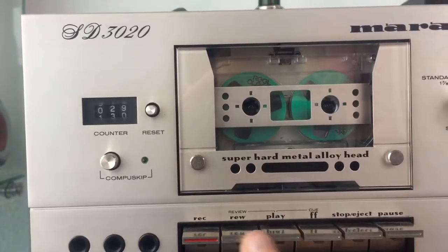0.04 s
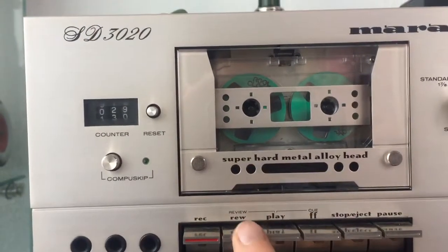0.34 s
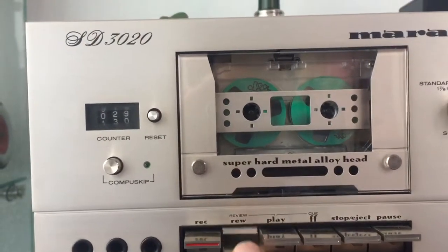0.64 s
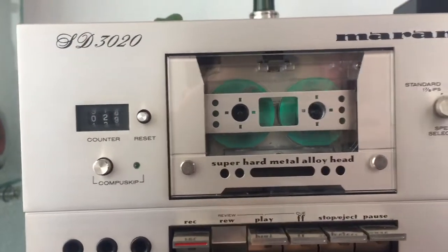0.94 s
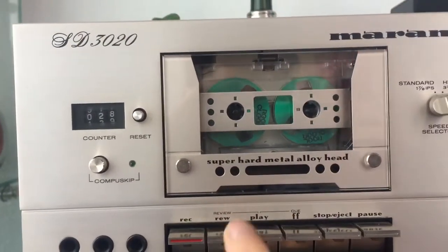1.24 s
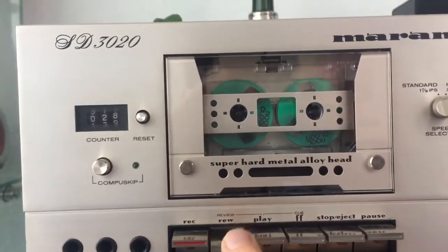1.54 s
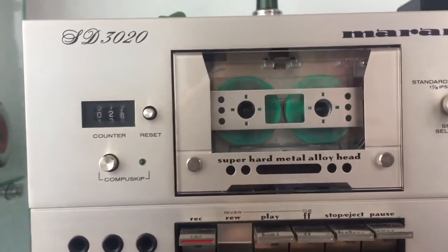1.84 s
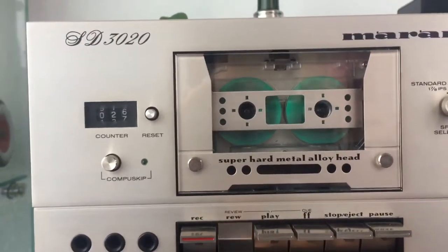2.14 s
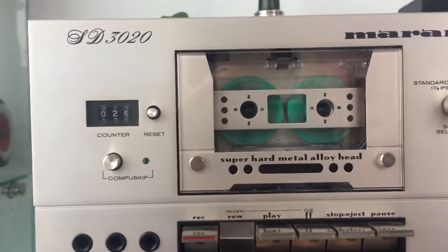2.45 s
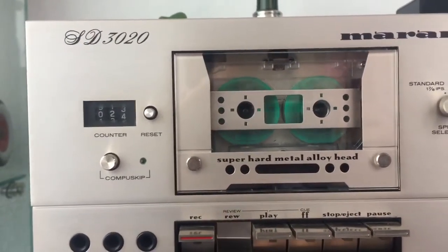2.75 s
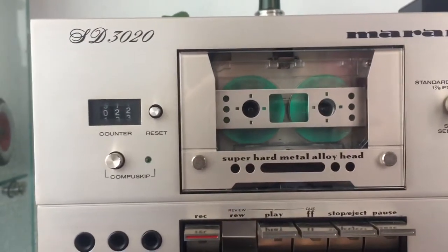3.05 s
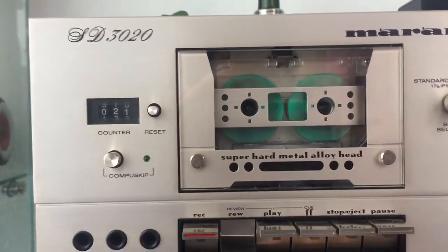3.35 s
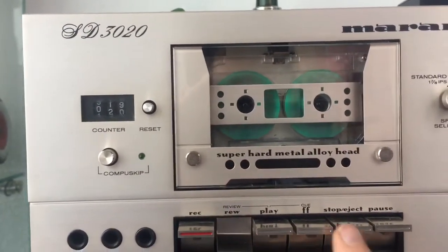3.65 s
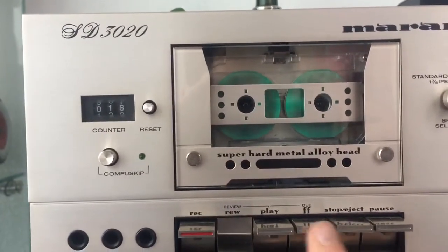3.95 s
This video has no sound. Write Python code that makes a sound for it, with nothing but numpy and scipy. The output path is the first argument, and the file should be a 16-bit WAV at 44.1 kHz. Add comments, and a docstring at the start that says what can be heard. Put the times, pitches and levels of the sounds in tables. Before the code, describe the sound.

Close up indoors, a cassette player's rewind mechanism chatters in a short burst that ends with a key clacking. After a pause it clicks on again and rattles quickly and steadily, with light tape hiss underneath.

```python
"""A quiet room, close to a cassette deck in rewind: one short try, a clack as the key springs back,
then a steady run. A worn idler wheel knocks at the same spots in each turn, about eleven turns a
second, and rings the chassis over gear chatter, the swish of the reel and tape hiss.
Keys and levers click; mains hum and a faint, slowly climbing drone lie underneath."""
import sys
import numpy as np
from scipy import signal
from scipy.fft import rfft, irfft
from scipy.io import wavfile

SR = 44100
rng = np.random.default_rng(int(sys.argv[2]) if len(sys.argv) > 2 else 0)


def to_wav(sig):
    """Store sig (one row per channel, or 1-D mono) as 16-bit WAV at the path in sys.argv[1].

    Samples outside -1..1 are clipped; the rate is SR.
    """
    pcm = np.clip(np.atleast_2d(sig), -1, 1) * 32767
    pcm = np.round(pcm).astype(np.int16)
    wavfile.write(sys.argv[1], SR, pcm.T)  # frames by channels


N = 176400
T = np.arange(N) / SR

# idler speed in the short try and the long run: time_s, turns_per_s
TRY_SPEED = [(.8, 10.64), (1.2, 10.64)]
RUN_SPEED = [(1.8, 10.756), (2.25, 10.932), (2.7, 11.106), (3.3, 11.206), (4, 11.312)]
TRY_START_TURNS, RUN_START_TURNS = .835, .012
# how hard the drive bears on the idler: time_s, level_db
TRY_LOAD = [(0.798, -29), (0.83, -6.5), (.84, -6), (0.872, 5.5), (0.902, -1.5), (1.06, -1), (1.121, -4),
            (1.145, -27), (1.19, -42)]
RUN_LOAD = [(1.793, -22), (1.829, -4), (2.02, -0.5), (2.071, -5), (2.451, -4), (2.999, -1), (3.5, 0),
            (4, 1)]
# worn spots around the rim: angle_turns, level_db
WORN_SPOTS = [(.068, -9), (.168, -3), (.226, -11), (.3, -11.5), (.4, -3.5), (.497, 0), (.548, -2.5),
              (.735, -17), (.808, -12.5), (.872, -13.5), (.915, -12)]

def idler(speed, start_turns, load, knock_db=-5, jitter_s=.0003):
    """One rewind: each worn spot knocks once a turn, with loose gear chatter in between."""
    turns, running = rotation(speed, start_turns)
    chatter = amp(-22.5) * crackle(turns, per_s=1100, scatter_db=2.5, swell_db=5)
    knocks = np.zeros(N)
    for angle, db in WORN_SPOTS:
        passes_s = T[1:][np.diff(np.floor(turns - angle)) > 0]
        for start_s, (slip, force) in zip(passes_s, rng.standard_normal((40, 2))):
            scatter_db = 2 * np.clip(force, -2, 1)
            add(knocks, start_s + jitter_s * slip, amp([knock_db + db + scatter_db]))
    return (rubber(knocks) + chatter) * running * amp(curve(load))


def rubber(knocks, cutoff_hz=1850):
    """The rubber wheel takes the top off its knocks."""
    return signal.lfilter(*signal.butter(2, cutoff_hz, fs=SR), knocks)


# accents, the hardest knocks of the drive: start_s, level_db
JOLTS = [(0.8357, -1), (0.9255, -1.5), (0.9316, -1), (1.0543, -2), (1.935, -5), (1.9979, -4), (2.123, -5),
         (2.2148, -5), (2.2753, -6), (2.3063, -4), (2.3665, -5), (2.3976, -4), (2.4578, -5), (2.4874, 0),
         (2.5354, -4), (2.5691, -2), (2.6147, -7), (2.6598, -1), (2.7055, -8), (2.8404, -3), (2.9394, -3),
         (2.9984, -4), (3.1087, -4), (3.1987, -2), (3.2584, -3), (3.2875, -1), (3.3483, -7), (3.3849, -4),
         (3.4378, -5), (3.5345, -1), (3.5634, -3), (3.6233, -2), (3.7119, -2), (3.8219, -1), (3.9099, -4)]
# tone of the shaken chassis: frequency_hz, level_db
CHASSIS_TONE = [(30, -52), (60, -57), (200, -32.5), (350, -34), (550, -40), (700, -12), (810, -19.5),
                (880, -12.5), (1000, -22.5), (1130, -.5), (1290, 2.5), (1440, -2), (1560, 1), (1750, -14),
                (2020, -7), (2450, -18.5), (2700, -27), (3200, -27), (4200, -28), (4850, -38.5),
                (5800, -36), (8000, -46), (16000, -50)]

def drive(duck_before_s=.006, duck_after_s=.002):
    """The idler's blows ring the chassis and rattle in the case."""
    blows = idler(TRY_SPEED, TRY_START_TURNS, TRY_LOAD) + idler(RUN_SPEED, RUN_START_TURNS, RUN_LOAD)
    for start_s, db in JOLTS:
        # nearby knocks and chatter are turned down so each hard knock sounds alone
        blows[round((start_s - duck_before_s) * SR):round((start_s + duck_after_s) * SR)] *= .3
        add(blows, start_s, amp(db) * rubber(signal.unit_impulse(SR // 100)))
    # all-pass: the chassis plate delays the mids of each knock
    poles = signal.iirpeak(1100, Q=1.43, fs=SR)[1]
    chassis = signal.lfilter(poles[::-1], poles, response(CHASSIS_TONE))
    rattle = amp(-2.5) * signal.fftconvolve(blows, chassis)[:N]
    case_ring = reverb(rattle, [(1000, .04)])  # 40 ms tail in every band
    return rattle + amp(-7) * case_ring


# key and lever hits: start_s, level_db, tilt_db_per_octave, thump_db, pitch_hz
CLICKS = [(0.1321, -43, 8.5, -51, 11300), (0.1881, -49, 2.5, -85, 1580), (0.6725, -53.5, -8, -62, 8100),
          (0.7011, -50.5, -7, -54.5, 1820), (0.753, -54.5, -2, -61.5, 3520),
          (0.844, -39.5, -1.5, -42, 3700), (1.0682, -40, -1.5, -73, 8900), (1.082, -34.5, -4.5, -44, 8520),
          (1.094, -39.5, 0, -50, 8500), (1.1203, -33.5, -2.5, -45.5, 5840), (1.189, -40, -4, -60, 2020),
          (1.1996, -22, -4.5, -57, 3460), (1.2003, -22, 5, -34.5, 8230), (1.205, -29, -13, -42, 2020),
          (1.2117, -35, -3, -55.5, 3230), (1.218, -35, -9, -48.5, 2090), (1.2871, -41.5, 3.5, -69, 7940),
          (1.292, -35.5, -4, -53, 3440), (1.3159, -42.5, 7, -81, 8500), (1.3206, -34, -5.5, -54, 3440),
          (1.441, -53.5, 2.5, -59, 3140), (1.67, -49, -2, -52, 8770), (1.6729, -43.5, -9.5, -49.5, 8500),
          (1.704, -51.5, -16, -68, 1114), (1.765, -54, -5.5, -86, 2450), (1.7775, -49.5, -10, -69, 6000),
          (1.819, -46.5, 8, -45, 5430), (1.839, -37, -9, -48, 1960), (1.8652, -36, -2.5, -45, 3330),
          (2.1958, -42.5, -2.5, -55, 3360), (2.202, -37, -5.5, -44.5, 2030), (2.479, -39, -2, -78, 8170),
          (2.51, -39, -14, -89, 3750), (3.8515, -54.5, 3, -75, 8900)]
# tone of a click's snap: frequency_hz, level_db
SNAP_TONE = [(300, -50), (700, -35), (1100, 2.5), (2000, 3), (3200, 0.5), (4600, -1), (6200, -4),
             (7200, -0.5), (8300, -0.5), (9800, -7), (12000, -5), (16000, -15.5)]
# ring of the levers and their spring: pitch_hz, level_db, t60_s
LEVER_MODES = [(1578, 2, 0.11), (2050, -0.5, 0.087), (3003, 0.5, 0.072), (3710, -2, 0.12), (6050, -4, 0.05)]

def keys(size=SR // 2):
    """Each click layers a snap, the ring of the struck part and of the levers, and a case thump."""
    out, t = np.zeros(N), T[:size]
    bands_hz = np.arange(300, 16000, 280)
    for start_s, db, tilt_db, thump_db, pitch_hz in CLICKS:
        bands_db = read(SNAP_TONE, bands_hz) + 3.2 * rng.standard_normal(len(bands_hz))
        snap = noise(np.column_stack([bands_hz, bands_db]), size, tilt_db) * strike(size, t60_s=.026)
        part = resonance(rng.standard_normal(size), pitch_hz, width_hz=350) * fade(size, t60_s=.03)
        levers = np.zeros(size)
        for hz, mode_db, t60_s in LEVER_MODES:
            detuned_hz = hz * rng.uniform(.9, 1.03)
            mode = np.sin(2 * np.pi * (detuned_hz * t + rng.random()))
            levers += amp(mode_db + tilt_db / 2 * np.log2(hz / 5000)) * mode * fade(size, t60_s)
        click = snap + amp(-5) * part + amp(-19.5) * levers
        add(out, start_s, amp(db) * click + amp(thump_db) * case_thump(size))
    return out


# low body under a click: frequency_hz, level_db
THUMP_TONE = [(30, -47), (60, -30), (130, -3), (175, -5), (205, 7), (275, -9), (360, 3), (440, -8),
              (560, -14.5), (700, 3), (820, -3), (1100, -5.5), (2500, -37)]

def case_thump(size):
    """A blow booms in the case, the low notes arriving a little later."""
    boom = noise(THUMP_TONE, size) * strike(size, t60_s=.12)
    lag_cycles = 3.5 * np.log(np.fft.rfftfreq(size, 1 / SR) + 60)
    return irfft(rfft(boom) * np.exp(-2j * np.pi * lag_cycles), size)


# thin resonances of the tape path: pitch_hz, width_hz, level_db
PATH_RESONANCES = [(5784, 660, -5), (6260, 300, -12), (8500, 330, -14.5), (9420, 390, -16)]
# tone of the reel swish and of the tape hiss: frequency_hz, level_db
SWISH_TONE = [(1500, -23), (2700, -6.5), (3200, 8), (3650, -26.5), (4200, -1.5), (4650, -24.5),
              (8000, -24.5)]
HISS_TONE = [(1500, 15), (4000, 6.5), (4900, -1), (6400, -6.5), (7200, 5), (7700, -15), (9000, -10.5),
             (10300, -9.5), (13500, -7.5), (16000, -18.5)]
# shared fader for hiss, rattle and sizzle: time_s, level_db
HISS_FADER = [(.805, -110), (.82, -56), (.86, -58.5), (1.11, -59), (1.17, -69), (1.2, -110), (1.79, -110),
              (1.825, -60), (1.95, -62), (2.3, -63), (4, -66)]
# sizzle against the hiss, easing off as the tape gets up to speed: time_s, level_db
SIZZLE_FADER = [(1.85, -11), (2.5, -21)]

def tape(motor_per_turn=3.55):
    """The tape hisses; in the long run its path rattles with the motor and the reel swishes each turn."""
    turns, running = rotation(RUN_SPEED, RUN_START_TURNS)
    motor_db = 4 * np.cos(2 * np.pi * (motor_per_turn * turns + .654))
    grit = crackle(turns, per_s=1000, scatter_db=3, swell_db=1.5) * amp(motor_db)
    rattle = sum(amp(db) * resonance(grit, hz, width_hz) for hz, width_hz, db in PATH_RESONANCES)
    reel_grit = crackle(turns, per_s=1000, scatter_db=3, swell_db=4.5)
    swish = unit(signal.fftconvolve(reel_grit, response(SWISH_TONE))[:N])
    swish *= running * amp(-64.5 + curve(RUN_LOAD))
    sizzle = resonance(rng.standard_normal(N), hz=14460, width_hz=600) * amp(curve(SIZZLE_FADER))
    return (rattle + noise(HISS_TONE) + sizzle) * amp(curve(HISS_FADER)) + swish


# low end of the chassis: frequency_hz, level_db
RUMBLE_TONE = [(30, -48), (60, -23), (100, -3.5), (150, -11), (175, 1.5), (203, 5.5), (240, 3), (280, 3),
               (320, -10), (362, 7.5), (430, -49), (480, 0.5), (560, -10), (800, -9), (2000, -64)]
# its swells: time_s, level_db
RUMBLE_FADER = [(.62, -103), (.7, -66.5), (.8, -67), (.85, -48), (1.02, -63.5), (1.16, -54), (1.26, -59),
                (1.42, -71), (1.6, -88), (1.7, -70), (1.78, -64.5), (1.87, -51.5), (2.1, -63), (2.22, -62),
                (2.3, -67), (4, -65)]

def rumble():
    """The chassis rumbles, most strongly as each rewind starts."""
    return noise(RUMBLE_TONE) * amp(curve(RUMBLE_FADER))


# faint drone: time_s, pitch_hz, level_db
DRONE = [(.35, 49.6, -85), (.48, 53.3, -67), (.57, 53.7, -58.5), (.73, 55, -60), (1.3, 57, -64),
         (1.5, 62.6, -69.5), (1.86, 71.8, -69), (2.42, 70.4, -68), (2.75, 76, -64), (3.13, 76.7, -63),
         (4, 75.6, -68.5)]
# room tone: frequency_hz, level_db
AIR_TONE = [(15, -39), (25, -13), (108, -2.5), (270, -12.5), (394, -11), (531, -19.5), (575, -21.5),
            (677, -14.5), (3340, -22.5), (16000, -33.5)]

def background(mains_hz=60.7):
    """The bed: a low drone that climbs, mains hum and room air."""
    drone = amp(curve(DRONE, column=2)) * np.sin(2 * np.pi * np.cumsum(curve(DRONE)) / SR)
    hum = amp(-72.5) * np.sin(2 * np.pi * mains_hz * T)
    return np.sqrt(2) * (drone + hum) + amp(-70) * noise(AIR_TONE)


def rotation(speed, start_turns):
    """The idler's angle in turns, and whether it is running."""
    running = (T >= speed[0][0]) & (T <= speed[-1][0])
    return start_turns + np.cumsum(curve(speed) * running) / SR, running


def crackle(turns, per_s, scatter_db, swell_db, peak_turns=.22):
    """Small random contacts that swell once a turn."""
    level_db = scatter_db * np.clip(rng.standard_normal(N), -2, 2)
    level_db += swell_db * np.cos(2 * np.pi * (turns - peak_turns))
    return amp(level_db) * rng.choice([-1, 1], N) * (rng.random(N) < per_s / SR)


def resonance(x, hz, width_hz):
    """A sound through a steep resonance, rms 1."""
    band = signal.iirpeak(hz, hz / width_hz, SR)
    return unit(signal.lfilter(*band, signal.lfilter(*band, x)))


def noise(tone, size=N, tilt_db=0):
    """Coloured noise of rms 1, tilted by tilt_db per octave around the low treble."""
    hz = np.fft.rfftfreq(size, 1 / SR)
    colour = amp(read(tone, hz) + tilt_db * np.log2((hz + 300) / 5000))
    return unit(irfft(rfft(rng.standard_normal(size)) * colour, size))


def response(tone, size=4096):
    """Minimum-phase impulse response of a body, energy 1."""
    log_gain = np.log(amp(read(tone, abs(np.fft.fftfreq(size, 1 / SR)))))
    spectrum = np.exp(np.conj(signal.hilbert(log_gain)))
    impulse = np.fft.ifft(spectrum).real[:size // 2]
    return impulse / np.linalg.norm(impulse)


def reverb(x, t60s, size=SR // 2):
    """A diffuse tail, each band dying at its own speed."""
    hz, t, bands = signal.stft(rng.choice([-1., 1.], size), SR, nperseg=128)
    decay = np.exp(-np.log(1000) * t / read(t60s, hz)[:, None])
    tail = signal.istft(bands * decay, SR, nperseg=128)[1]
    tail[:SR // 400] = 0  # 2.5 ms pre-delay
    return signal.fftconvolve(x, tail / np.linalg.norm(tail))[:N]


def fade(size, t60_s):
    """Exponential decay, 60 dB down after t60_s."""
    return np.exp(-np.log(1000) * np.arange(size) / SR / t60_s)


def strike(size, t60_s, attack_s=.004):
    """Envelope of a hit: fast attack, then decay."""
    return fade(size, t60_s) * (1 - fade(size, attack_s))


def amp(db):
    """Decibels to gain."""
    return 10 ** (np.asarray(db) / 20)


def unit(x):
    """Scales to rms 1."""
    return x / np.sqrt(np.mean(x ** 2) + 1e-20)


def read(points, hz):
    """Reads a table along a log-frequency axis."""
    table_hz, values = np.transpose(points)
    return np.interp(np.log(hz + 1), np.log(table_hz), values)


def curve(points, column=1):
    """One column of a time table, sample by sample."""
    columns = np.transpose(points)
    return np.interp(T, columns[0], columns[column])


def add(mix, start_s, sound):
    """Drops a sound into the mix."""
    part = mix[max(round(start_s * SR), 0):][:len(sound)]
    part += sound[:len(part)]


# the room's short tail: frequency_hz, t60_s
ROOM_DECAY = [(200, 0.26), (1500, 0.27), (6000, 0.17), (16000, 0.083)]

def scene():
    """The deck up close with a touch of its small room, in mono."""
    deck = drive() + tape() + rumble() + keys()
    return (deck + amp(-13) * reverb(deck, ROOM_DECAY) + background())[None]


def record(dry, cutoff_hz=16050):
    """A steep high cut on the whole mix."""
    lowpass = signal.firwin(511, cutoff_hz, window=("kaiser", 9), fs=SR)
    return signal.oaconvolve(dry, lowpass[None], "same")


dry = scene()
out = record(dry)
to_wav(out)
```